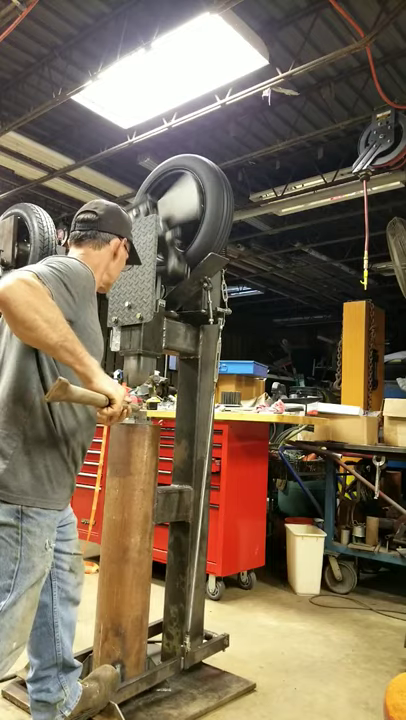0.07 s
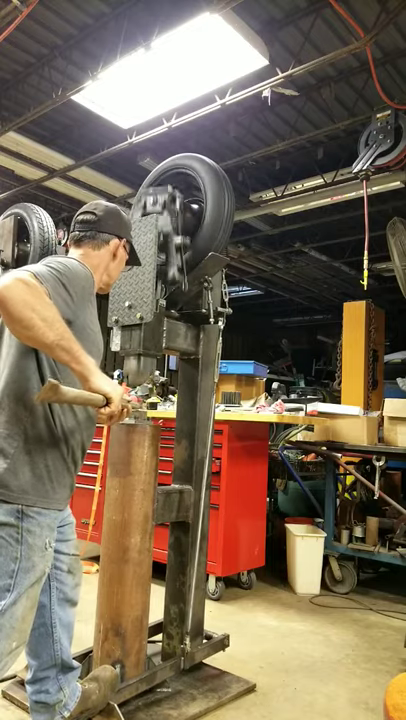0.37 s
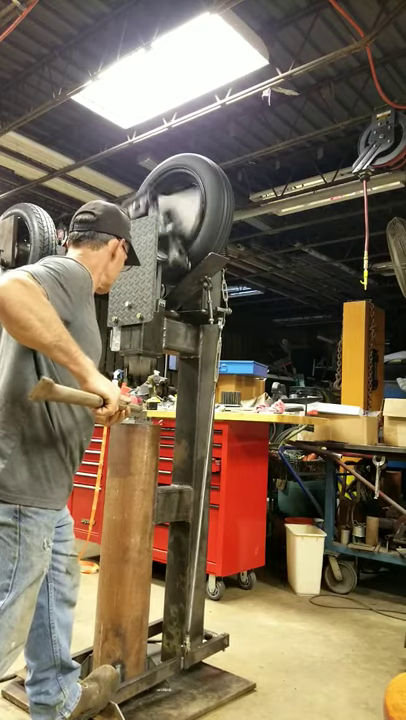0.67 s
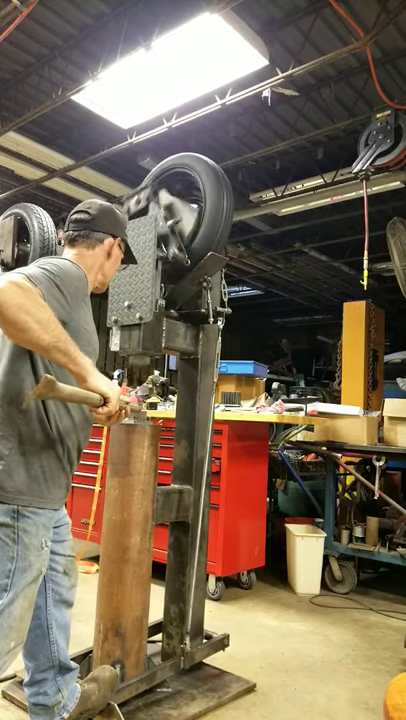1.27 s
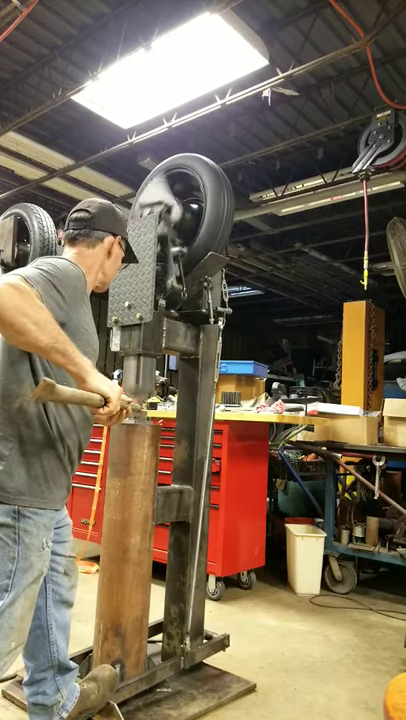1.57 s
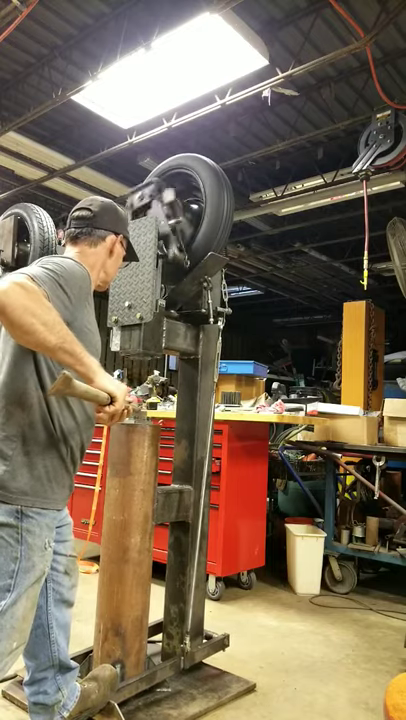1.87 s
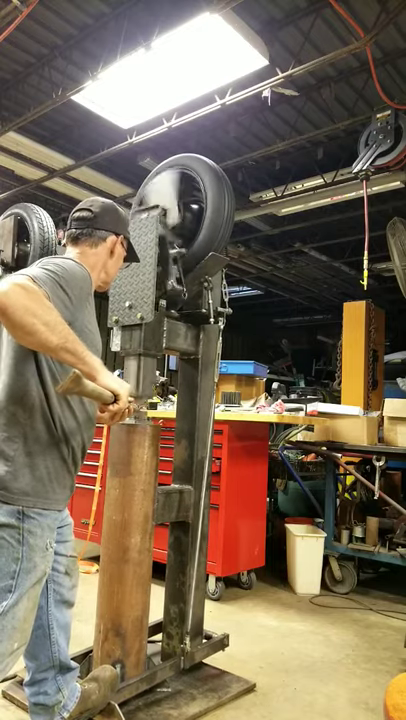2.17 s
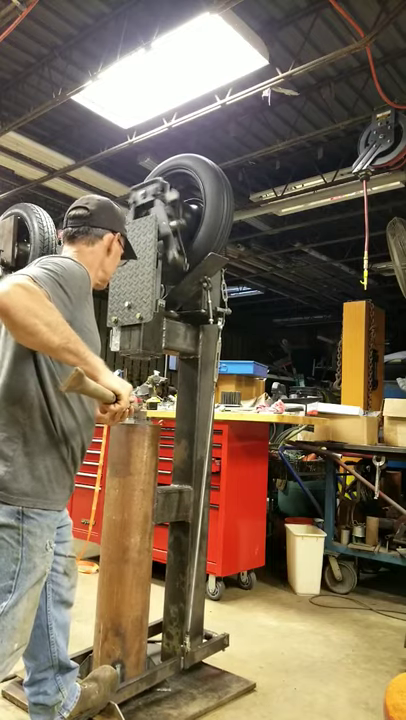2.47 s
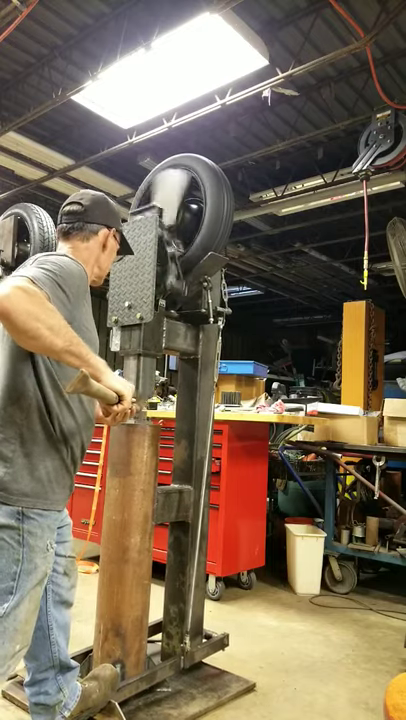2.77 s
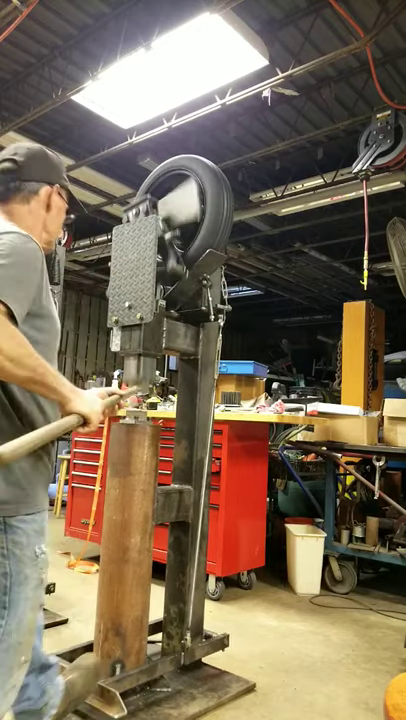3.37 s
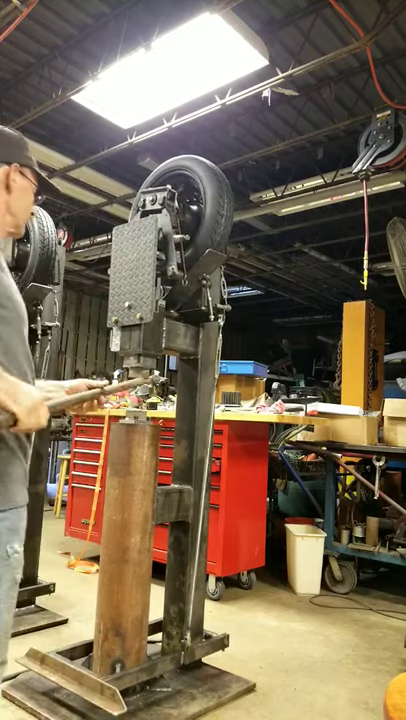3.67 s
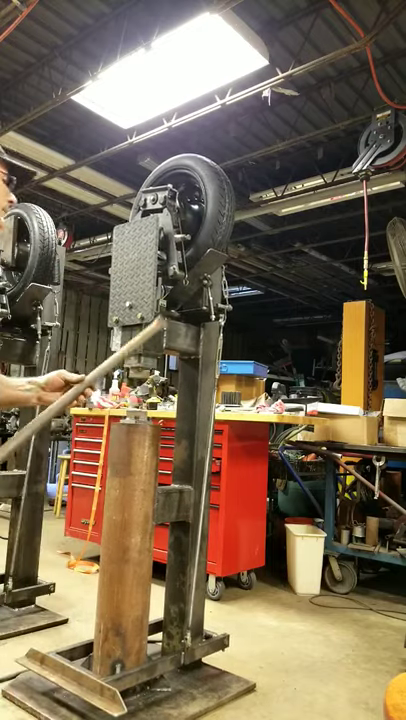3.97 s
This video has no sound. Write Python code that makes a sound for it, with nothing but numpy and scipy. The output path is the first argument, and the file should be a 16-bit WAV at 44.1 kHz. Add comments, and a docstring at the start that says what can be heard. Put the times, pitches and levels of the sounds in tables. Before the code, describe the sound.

A power hammer strikes a steel bar about five times a second, each blow thudding and ringing in a large echoing workshop. It stops near the end, and its loose linkage rattles briefly over a faint motor hum.

```python
"""Power hammer forging steel

A tire power hammer strikes a steel bar in a big workshop, about five blows a second, then stops.
Each blow of the ram (the moving weight) thuds in the anvil post, cracks, and rings the frame and
the dies (the striking faces). A low boom and the hall's echo follow; sometimes the bar sings too.
The linkage that lifts the ram clanks between blows and settles at the end. A motor hums throughout."""
import sys
import numpy as np
from scipy import signal
from scipy.fft import rfft, irfft, next_fast_len
from scipy.io import wavfile

SR = 44100
rng = np.random.default_rng(int(sys.argv[2]) if len(sys.argv) > 2 else 0)


def dump_mix(stems):
    """Bounce the given channels to the path in sys.argv[1] as a 16-bit WAV at rate SR."""
    frames = np.atleast_2d(stems).T  # one column per channel
    limited = np.clip(frames, -1, 1)  # hard clip at full scale
    pcm = np.round(limited * 32767).astype(np.int16)
    wavfile.write(sys.argv[1], SR, pcm)


N = 176400
T = np.arange(SR) / SR  # one second of time, for a single sound

# Levels in the tables are relative. A "t60" is the time a sound takes to fade by 60 dB.
# each blow (time [s], thud [dB], knock [dB], clang [dB], bite [dB], crack [dB], boom [dB])
BLOWS = [(-0.035, -3.5, -2.5, -3, -6, -7.5, -30), (0.172, -4.5, -5.5, -2, -1, -3, -12.5),
         (0.379, -3, -4.5, -4, 0.5, -8, -12.5), (0.585, -3, -7, -1, -1, -2, -10),
         (0.793, 0.5, 0.5, -4, 2, -2, -5), (0.998, 1.5, 3, 1, 3, -1.5, -1.5),
         (1.2034, 1.5, 5, 0, -0.5, 4.5, -1), (1.409, 2.5, 6.5, 4.5, 1, -6, -6),
         (1.6138, -1, 1, 3, 3.5, -0.5, -3.5), (1.8191, 0.5, 5.5, -4, 0, 2.5, -0.5),
         (2.0254, 0, 7.5, -0.5, 2.5, -0.5, 0), (2.2296, 0, 3.5, -2.5, 2.5, -0.5, -4.5),
         (2.4351, 1, 9, 1.5, 2, 0, 0), (2.6389, -1.5, 10, 3, 0.5, 2, -0.5),
         (2.847, -0.5, 10.5, 3.5, -0.5, -5.5, 0.5), (3.0504, 2, 8.5, 2, -3, -5, -2),
         (3.2545, -2, 5.5, -1, -4.5, -1.5, -4)]
# where thud, knock, clang, bite and crack lie (frequency [Hz])
BAND_HZ = [200, 680, 2400, 4800, 11000]
# tone of the ram's landing (frequency [Hz], level [dB])
IMPACT_TONE = [(30, -25), (120, -6), (400, -1.5), (650, -8.5), (1250, -13), (1700, -16), (2100, -8),
               (3300, -9), (4400, -14), (6200, -10.5), (7800, -22), (11500, -11.5), (15000, -19)]
# tone of the hall's echo (frequency [Hz], level [dB])
ECHO_TONE = [(30, -26), (100, -9), (260, -2), (450, -3.5), (750, -10.5), (1300, -16), (2150, -9),
             (4300, -13.5), (7800, -24), (11500, -22), (15000, -26)]
# how long the hall echoes (frequency [Hz], t60 [s])
HALL_T60 = [(400, 0.87), (3000, 0.67), (6000, 0.94), (12000, 0.61)]
# noise that all blows have in common (frequency [Hz], share [0 to 1])
SAME_SHARE = [(600, 0.81), (2000, 0.54)]
# the machine's countless small resonances (frequency [Hz], typical peak or dip [dB])
JANGLE_DEPTH = [(900, 1.5), (2000, 4), (4000, 6)]
# how alike left and right sound (frequency [Hz], likeness [-1 to 1])
STEREO_LIKENESS = [(30, 0.75), (150, 0.96), (600, 0.86), (1000, -0.052), (2200, -0.07)]
# ringing notes of the dies and ram (pitch [Hz], level [dB])
DIE_NOTES = [(1301, -38.5), (1705, -42), (2172, -28), (2676, -29), (3130, -37), (3225, -38.5),
             (3665, -34.5), (3790, -32), (4200, -36.5), (4405, -32.5), (4775, -44), (5045, -45),
             (5390, -48.5)]
# ringing notes of the frame (pitch [Hz], level [dB])
FRAME_NOTES = [(473, -36), (588, -43), (710, -32), (1690, -45.5), (1765, -44), (1901, -37), (2008, -32),
               (2132, -33), (2606, -28), (3150, -36), (3770, -40), (4350, -37.5)]
# thumps of post and floor (delay [s], half width [s], pitch [Hz], level [dB])
POST_THUMPS = [(.014, 0.013, 174.6, -24.5), (.023, 0.006, 258, -21), (.122, 0.0052, 251.3, -26.5)]
# two hollow knocks as the ram lands and rebounds, then the linkage's knock as it lifts
# (delay [s], half width [s], pitch [Hz], level [dB])
HOLLOW_KNOCKS = [(.0055, .0022, 480, -27), (.0135, 0.0092, 570, -28.5), (.113, .004, 520, -34)]
# swells of the boom (delay [s], half width [s], level [dB])
BOOM_SWELLS = [(0.048, 0.0089, -15.5), (0.077, 0.013, -17), (.124, .01, -22)]
# the motor's notes (pitch [Hz], level [dB])
HUM_NOTES = [(80.7, -21), (269.2, 6.5), (1260, -12)]
# the hum swells as the load comes off (time [s], level [dB])
HUM_LEVEL = [(0, -52), (3.1, -36.5), (3.4, -32.5), (3.7, -39.5), (4, -38)]
# tone of the workshop's air (frequency [Hz], level [dB])
AIR_TONE = [(25, -9), (80, -7), (400, -2.5), (900, 1), (1600, -9), (4000, -12), (15000, -33)]
# notes the bar sings (time [s], pitch [Hz], level [dB], base t60 [s])
BAR_NOTES = [(.02, 2172, -23.5, 0.25), (0.172, 3150, -10.5, 0.072), (.185, 2700, -19.5, 0.31),
             (0.384, 3205, -15, 0.12), (.59, 5150, -28, .3), (0.807, 2676, -21, 0.31),
             (1.209, 2677, -22, 0.26), (1.62, 4270, -15, 0.17), (2.65, 6050, -21, 0.24),
             (2.857, 4420, -15, 0.37)]
# the linkage's last knocks (time [s], level [dB])
LAST_KNOCKS = [(3.455, -10.5), (3.538, -18.5), (3.747, -22)]
# tone of its rattle (frequency [Hz], level [dB])
RATTLE_TONE = [(100, -42), (900, 0), (2200, -3), (4300, 0), (8000, -14), (15000, -14.5)]

CHATTER_DB, CHATTER_HZ = 1, 412  # the dies bounce and chatter within a blow


def amp(db):
    """Turn decibels into a gain."""
    return 10 ** (np.asarray(db) / 20)


def unit(x):
    """Scale x to an average (rms) level of 1."""
    return x / np.sqrt(np.mean(x ** 2) + 1e-20)


def along(table, hz):
    """Read a table at any frequency, on a log scale."""
    freqs, values = np.transpose(table)
    return np.interp(np.log(hz + 1), np.log(freqs + 1), values)


def filtered(x, response):
    """Scale each frequency in x by response(hz)."""
    n = x.shape[-1]
    padded = next_fast_len(n + 4096)
    return irfft(rfft(x, padded) * response(np.fft.rfftfreq(padded, 1 / SR)), padded)[..., :n]


def add(out, start, sound):
    """Mix a sound in at a start time in seconds."""
    i = round(start * SR)
    part = sound[:, max(-i, 0):max(N - i, 0)]
    out[:, max(i, 0):max(i, 0) + part.shape[1]] += part


def fade(t, t60):
    """Hold until t = 0, then die away."""
    return np.exp(-np.log(1000) * np.maximum(t, 0) / t60)


def rise(seconds):
    """A soft start."""
    return 1 - np.exp(-T / seconds)


def swell(delay, width):
    """A smooth bump after a blow (both in seconds)."""
    return np.exp(-((T - delay) / width) ** 2 / 2)


def wobble(rate, t):
    """A line through random points, rate of them a second."""
    points = rng.standard_normal(512)
    return np.interp(t * rate, np.arange(len(points)), points)


def coloured(noises, tone):
    """Shape two noises into one stereo noise with this tone."""
    def response(hz):
        width = np.arccos(np.clip(along(STEREO_LIKENESS, hz), -1, 1)) / 2
        return amp(along(tone, hz)) * [np.cos(width), np.sin(width)]
    mid, side = filtered(noises, response)
    return unit(np.array([mid + side, mid - side]))


def jangle(spacing_hz=55):
    """The machine's small resonances: frequencies and their random levels in dB."""
    hz = np.arange(0, SR / 2, spacing_hz)
    return hz, along(JANGLE_DEPTH, hz) * rng.standard_normal(len(hz))


def ram_burst(metal, tone, hold_s=0.018, split_hz=1320):
    """The ram lands and bites a second time: a burst of noise whose low part dies sooner."""
    noise = filtered(coloured(metal, IMPACT_TONE), tone)
    low = filtered(noise, lambda hz: 1 / (1 + (hz / split_hz) ** 4))
    burst = low * fade(T - hold_s, t60=0.015) + (noise - low) * fade(T - hold_s, t60=0.21)
    contacts = rise(0.001) * (1 + 0.34 * swell(delay=0.012, width=0.0021))
    chatter = unit(amp(CHATTER_DB * wobble(CHATTER_HZ, T)))
    return burst * contacts * chatter


def hall_echo(metal, tone):
    """The hall answers with a wash of noise, each frequency fading at its own speed."""
    hz, t, bands = signal.stft(coloured(metal, ECHO_TONE), SR, nperseg=512)
    bands = bands * tone(hz)[:, None] ** 0.85 * fade(t, along(HALL_T60, hz)[:, None])
    return signal.istft(bands, SR)[1][:, :SR] * rise(0.01)


def impacts(same_jangle=0.35):
    """Each blow jangles the machine and fills the hall, partly alike every time and partly new."""
    out = np.zeros((2, N))
    share = lambda hz: np.clip(along(SAME_SHARE, hz), 0, 1)
    common = filtered(rng.standard_normal((2, 2, SR)), lambda hz: np.sqrt(share(hz)))
    jangle_hz, machine_db = jangle()
    for start, *band_db, _ in BLOWS:
        jangle_db = np.sqrt(same_jangle) * machine_db + np.sqrt(1 - same_jangle) * jangle()[1]
        fresh = filtered(rng.standard_normal((2, 2, SR)), lambda hz: np.sqrt(1 - share(hz)))
        near, far = filtered(common + fresh, lambda hz: amp(np.interp(hz, jangle_hz, jangle_db)))
        tone = lambda hz: amp(along(list(zip(BAND_HZ, band_db)), hz))
        add(out, start, amp(-16) * ram_burst(near, tone) + amp(-19.5) * hall_echo(far, tone))
    return out


def ring(notes, base_t60, scatter_db=2, waver=1.3, waver_hz=32):
    """Struck steel rings; the hall makes each note waver differently left and right."""
    out = np.zeros((2, SR))
    for hz, db in notes:
        t60 = base_t60 * (2150 / hz) ** 0.3  # higher notes die sooner
        level = amp(db + scatter_db * rng.normal()) * rise(15 / hz) * fade(T, t60)
        cycles = hz * T + rng.random()
        for side in out:
            phase = 2 * np.pi * cycles + 1.2 * rng.normal()
            sine = (1 + waver * wobble(waver_hz, T)) * np.sin(phase)
            cosine = waver * wobble(waver_hz, T) * np.cos(phase)
            side += level * (sine + cosine) / np.hypot(1, waver)
    # each note flares at first, then rings on more softly in the hall
    return out * (1 + fade(T, t60=0.13))


def dies_and_frame(lift_s=0.114):
    """Heavy blows choke the dies and shake the frame; the ram clanks again as it is lifted."""
    out = np.zeros((2, N))
    for start, _, knock_db, *_ in BLOWS:
        dies = amp(1 - 0.13 * knock_db) * ring(DIE_NOTES, base_t60=0.63)
        frame = amp(-8 + knock_db) * ring(FRAME_NOTES, base_t60=1)
        add(out, start, dies + frame)
        add(out, start + lift_s + 0.005 * rng.normal(), amp(-10.5) * dies)
    return out


def thumps(rows):
    """Brief low notes that follow a blow."""
    notes = (amp(db) * swell(at, width) * np.sin(2 * np.pi * hz * T) for at, width, hz, db in rows)
    return rise(0.001) * sum(notes)


def thud_and_boom():
    """Ram and linkage knock and the post thumps; a low note swells, bends in pitch and echoes once."""
    out = np.zeros((2, N))
    post, knocks = thumps(POST_THUMPS), thumps(HOLLOW_KNOCKS)
    pitch_hz = 345.4 + 26.7 * swell(delay=0.06, width=0.01954)
    level = sum(amp(db) * swell(at, width) for at, width, db in BOOM_SWELLS)
    boom = level * np.sin(2 * np.pi * np.cumsum(pitch_hz) / SR)
    for start, thud_db, knock_db, *_, boom_db in BLOWS:
        add(out, start, (amp(thud_db) * post + amp(knock_db) * knocks + amp(boom_db) * boom)[None])
    return out


def motor(drift=0.15):
    """The motor hums, a little unsteadily, over the soft noise of the workshop's air."""
    t = np.arange(N) / SR
    hum = sum(amp(db + wobble(10, t)) * np.sin(2 * np.pi * hz * t + drift * wobble(15, t))
              for hz, db in HUM_NOTES)
    level = amp(np.interp(t, *np.transpose(HUM_LEVEL)))
    air = amp(-51.5) * coloured(rng.standard_normal((2, N)), AIR_TONE)
    return level * unit(hum) + air


def bar():
    """Now and then the bar sits loosely on the die and sings one bright note."""
    out = np.zeros((2, N))
    for start, hz, db, base_t60 in BAR_NOTES:
        add(out, start, ring([(hz, db)], base_t60))
    return out


def linkage_settling(t60=0.39):
    """The loose linkage rattles and rings as the wheel comes to rest."""
    out = np.zeros((2, N))
    for start, db in LAST_KNOCKS:
        resonances = jangle()
        metal = filtered(rng.standard_normal((2, SR)), lambda hz: amp(np.interp(hz, *resonances)))
        chatter = amp(CHATTER_DB * wobble(CHATTER_HZ / 2, T))
        rattle = coloured(metal, RATTLE_TONE) * rise(0.008) * fade(T, t60) * chatter
        add(out, start, amp(db) * (amp(-15.5) * rattle + ring(DIE_NOTES[:4], t60)))
    return out


def scene():
    """The whole machine, a little to the right."""
    machine = impacts() + dies_and_frame() + bar() + thud_and_boom() + linkage_settling() + motor()
    return machine * amp([[-0.5], [0.5]])


def record(dry):
    """Round off the loudest peaks and cut the highest treble."""
    top_hz = 14650
    rounded = dry / (1 + dry ** 6) ** (1 / 6)
    return filtered(rounded, lambda hz: 1 / np.sqrt(1 + (hz / top_hz) ** 240))


dry = scene()
out = record(dry)
dump_mix(out)
```